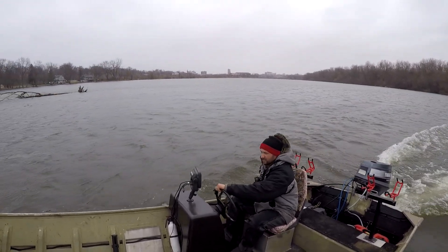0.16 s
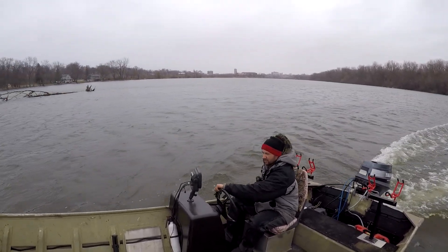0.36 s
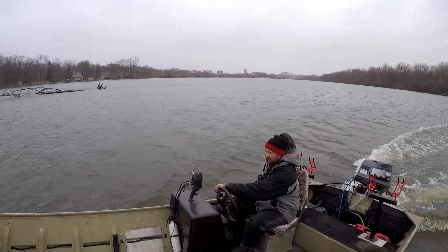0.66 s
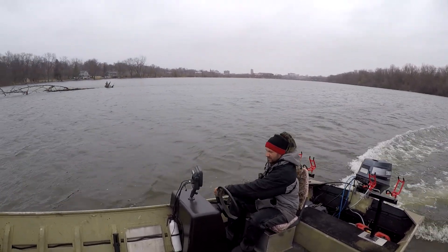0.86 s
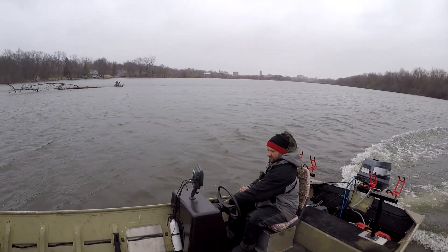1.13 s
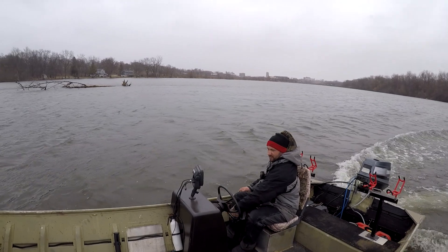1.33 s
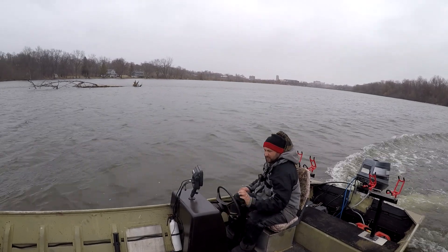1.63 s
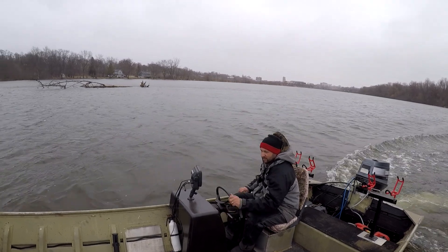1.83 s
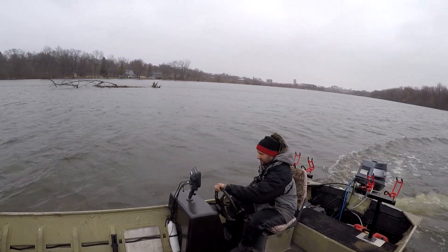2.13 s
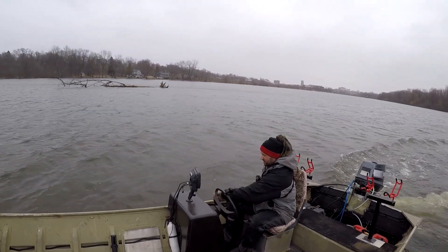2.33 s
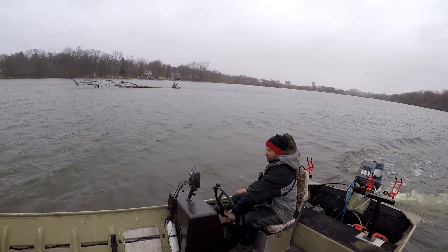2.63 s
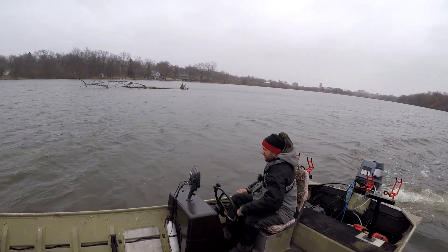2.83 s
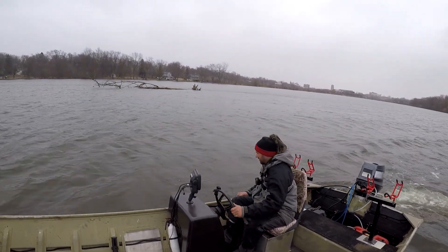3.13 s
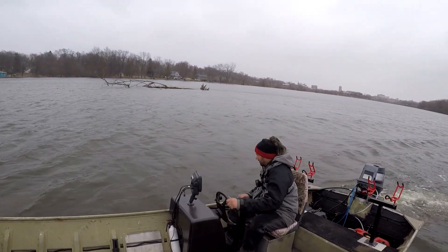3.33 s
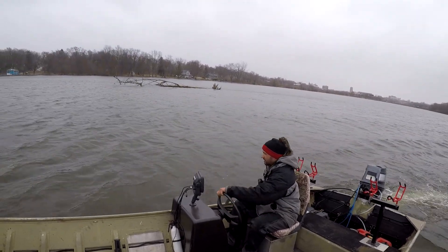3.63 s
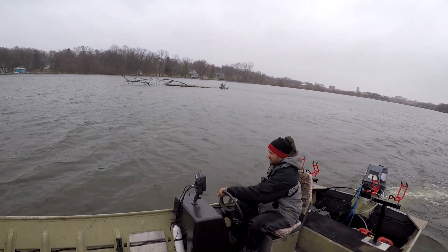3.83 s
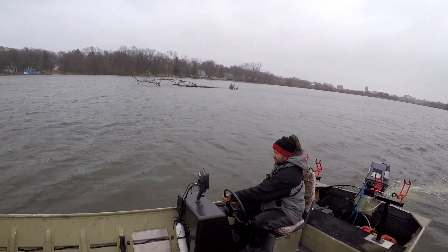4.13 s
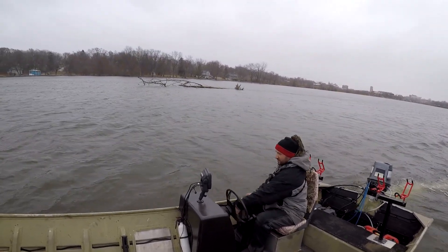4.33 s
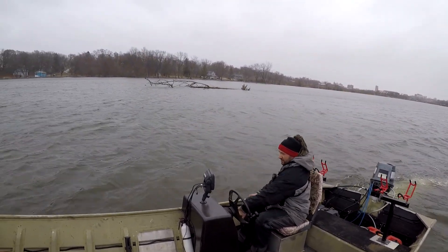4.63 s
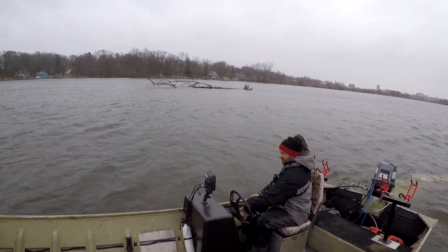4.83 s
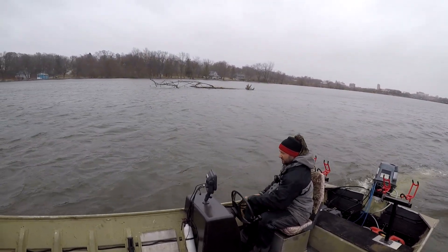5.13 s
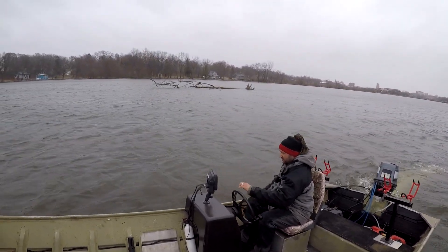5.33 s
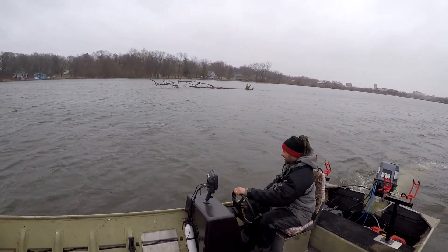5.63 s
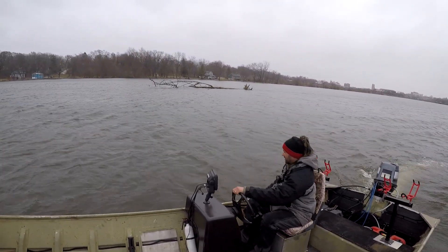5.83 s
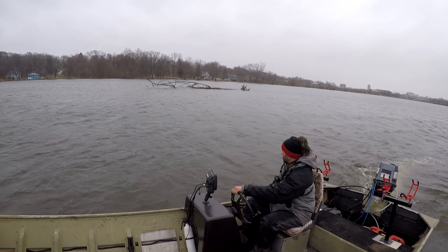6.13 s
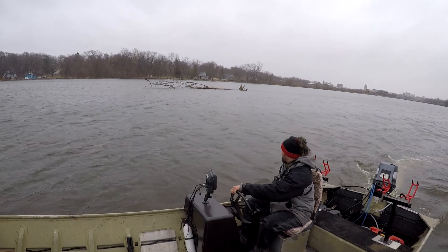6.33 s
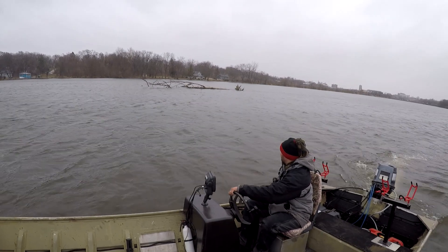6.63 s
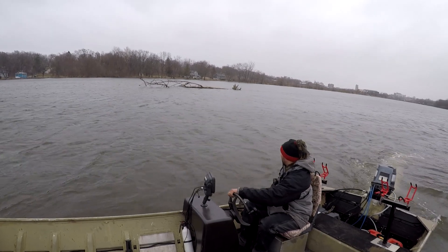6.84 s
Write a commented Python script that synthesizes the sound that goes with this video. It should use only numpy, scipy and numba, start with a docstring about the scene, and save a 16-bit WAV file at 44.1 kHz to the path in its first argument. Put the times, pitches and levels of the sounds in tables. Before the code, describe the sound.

An outboard motor hums low and steady while a flat metal boat drones, wind buffets, water washes and slaps the hull, and loose gear ticks.

```python
"""Outboard jet boat under way

A three-cylinder jet outboard hums at part throttle on a flat metal boat, heard by a small cased camera on a pole.
The motor is a series of shaft-rate tones; the hull drones through noise-driven resonances; wind, wash and spray
are shaped noise. Bubbles gurgle as rising sines, waves slap trapped air, splashes hiss in swelling bands, drops
patter as noise clicks and loose gear ticks by ringing its modes. The camera rides its gain and rounds the peaks."""
import sys
import numpy as np
from scipy import signal
from scipy.fft import rfft, irfft
from scipy.io import wavfile
from scipy.ndimage import uniform_filter1d
from numba import njit

SR = 44100
rng = np.random.default_rng(int(sys.argv[2]) if len(sys.argv) > 2 else 0)


def bounce(signal):
    """Save signal as a 16-bit WAV file at the path given by the first command-line argument."""
    frames = np.transpose(np.atleast_2d(signal))
    limited = np.clip(frames, -1, 1)
    pcm = np.round(limited * 32767).astype(np.int16)
    wavfile.write(sys.argv[1], SR, pcm)


N = 307377
T = np.arange(N) / SR


def undb(db):
    """Decibel law: the amplitude gain of a level in dB."""
    return 10 ** (np.asarray(db) / 20)


def unit(x):
    """Power normalisation: scaled to rms 1."""
    return x / np.sqrt(np.mean(x ** 2))


def crest(x):
    """Peak normalisation: scaled to peak 1."""
    return x / np.max(abs(x))


def read(table):
    """Linear interpolation: every column of a curve table, one value a sample."""
    s, *columns = np.transpose(table)
    return [np.interp(T, s, c) for c in columns]


def band(x, hz, width_hz):
    """Simple resonance: a two-pole filter with gain 1 at its centre."""
    return signal.lfilter(*signal.iirpeak(hz, hz / width_hz, fs=SR), x)


def steep(x, hz, width_hz):
    """Cascaded resonance: the same one applied twice, for dark skirts."""
    return band(band(x, hz, width_hz), hz, width_hz)


def smooth_twice(x, size):
    """Low-pass smoothing: two running means of the same length in samples."""
    return uniform_filter1d(uniform_filter1d(x, size), size)


def walk(rate):
    """Slow random modulation: levels held 1 / rate s and slewed twice; spread 1."""
    hold = int(SR / rate)
    steps = np.repeat(rng.standard_normal(N // hold + 1), hold)
    return unit(smooth_twice(steps, hold)[:N])


def coloured(spectrum, flicker_db, grain_db):
    """Spectral shaping of noise: each third-octave slice flickers alone; shared grains roughen them all."""
    hz, db = np.transpose(spectrum)
    f = np.maximum(np.arange(N // 2 + 1) * SR / N, 1)
    white = rng.standard_normal(N) * undb(grain_db * walk(150))
    full = rfft(white) * undb(np.interp(np.log(f), np.log(hz), db, -120, -120))
    place = 3 * np.log2(f / hz[0])  # in third octaves above the lowest corner
    slices = int(3 * np.log2(hz[-1] / hz[0])) + 2
    out = 0
    for k in range(slices):
        weight = np.clip(1 - abs(place - k), 0, 1)  # neighbouring slices crossfade
        out = out + irfft(full * weight, N) * undb(flicker_db * walk(18))
    return unit(out)


# Shaft speed and firing tone. Each row: time in seconds, shaft turns in Hz, mean firing tone rms in dB.
SHAFT = [(0, 32.87, -17), (.23, 33.24, -21), (.56, 32.56, -17), (.8, 32.52, -21.5), (1.05, 31.94, -21),
         (1.4, 32.13, -18.5), (1.84, 32.37, -18), (2.46, 33.12, -21), (2.75, 32.3, -22), (3.3, 32.43, -25),
         (3.8, 32.5, -18.5), (4.15, 33.02, -22), (4.35, 33.68, -18.5), (4.8, 33.89, -23),
         (5.4, 33.99, -18.5), (5.8, 33.8, -24), (6.2, 34.35, -21.5), (6.75, 33.8, -18.5),
         (6.97, 34.36, -20.5)]
# Overtones that come and go with the load.
# Each row: time in seconds, then the mean rms in dB of the 6th, 8th and 9th orders.
LOAD_OVERTONES = [(0, -46, -37.5, -46.5), (.5, -32.5, -42.5, -51), (1.05, -45, -38, -45),
                  (1.5, -51, -32.5, -37.5), (1.9, -29.5, -31.5, -42), (2.1, -30.5, -33, -42.5),
                  (2.7, -25, -33, -36), (2.95, -36.5, -32.5, -35), (3.3, -31, -36, -39),
                  (3.6, -27, -28, -39), (3.9, -46, -28.5, -31), (4.3, -30.5, -31.5, -34),
                  (4.7, -30.5, -35.5, -32.5), (5.2, -24.5, -38.5, -31), (5.6, -29, -28.5, -28),
                  (6.0, -34, -34.5, -29), (6.4, -37, -35.5, -26.5), (6.97, -35, -30.5, -27.5)]
# Weak tones heard through the hull. Each row: multiple of the shaft rate, level in dB against the drone curve.
HULL_BORNE_ORDERS = [(1, -10.5), (2, -17), (4, -16), (5, -13), (7, -17), (10, -20), (11, -18.5),
                     (12, -26.5)]
# A fainter tone under the firing tone. Each row: time in seconds, mean rms in dB.
FAINT_UNDERTONE = [(0, -30.5), (.7, -34.5), (1.2, -24), (1.7, -33), (2.3, -30.5), (4, -33.5), (6.97, -41)]
UNDERTONE_ORDER = 2.45  # multiple of the shaft rate


def motor(hull_db):
    """Harmonic synthesis: tones on multiples of the shaft rate, mostly whole, waver with uneven firings."""
    hz, firing_db = read(SHAFT)
    turn = 2 * np.pi * np.cumsum(hz * (1 + 0.0025 * walk(12))) / SR
    # each tone: order, level in dB, waver in dB
    tones = list(zip((3, 6, 8, 9), (firing_db, *read(LOAD_OVERTONES)), (.9, 3.0, 3.0, 3.0)))
    tones += [(round(k), hull_db + db, 4.0) for k, db in HULL_BORNE_ORDERS]
    tones.append((UNDERTONE_ORDER, read(FAINT_UNDERTONE)[0], 3.0))
    out = 0
    for order, db, waver_db in tones:
        amplitude = np.sqrt(2) * undb(db + waver_db * walk(17))  # sqrt(2) turns rms into peak
        phase = order * turn + 0.05 * order * walk(20) + rng.uniform(0, 2 * np.pi)
        out = out + amplitude * np.sin(phase)
    return out


# Drone curve of the boat under way. Each row: time in seconds, level in dB before a 1 dB cut.
DRONE = [(0.0, -30), (0.29, -24.5), (0.41, -32), (0.49, -30), (1.18, -26.5), (1.8, -23.5), (2.7, -21),
         (2.79, -24.5), (3.53, -21), (3.84, -23), (3.87, -16.5), (4.02, -22), (4.44, -23.5), (5.32, -21),
         (6.39, -22), (6.46, -19.5), (6.83, -22), (6.97, -17)]
# Panel resonances. Each row: centre in Hz, width in Hz of each of two passes, mean relative level in dB.
PANEL_MODES = [(82.4, 40, -3.5), (132.4, 62, -1), (191.8, 54, 0), (266, 83, -1), (326, 58, -1.5),
               (378.4, 33, -5.5)]


def hull(level_db):
    """Forced vibration: water under the bottom shakes the panel resonances."""
    ring = 0
    for hz, width_hz, db in PANEL_MODES:
        mode = unit(steep(rng.standard_normal(N), hz, width_hz))
        ring = ring + undb(db + 1.22 * walk(14)) * mode
    return undb(level_db - 1.0) * unit(ring)


# Wind gusts. Each row: time in seconds, buffeting level in dB before a 0.1 dB lift.
BUFFETS = [(0.0, -43), (0.09, -14), (0.13, -28), (0.29, -16.5), (0.39, -38), (0.43, -20.5), (0.52, -25),
           (0.79, -19.5), (0.89, -33), (1.03, -19.5), (1.05, -31), (2.45, -22), (2.52, -16), (2.64, -32),
           (3.92, -22.5), (4.02, -15), (4.21, -24.5), (4.44, -21.5), (4.54, -18.5), (4.6, -14), (4.68, -24),
           (4.95, -19.5), (5.01, -32), (5.8, -20.5), (6.81, -33.5), (6.97, -12.5)]
# Wind spectrum. Each row: frequency in Hz, relative density in dB per Hz.
WIND_SPECTRUM = [(4.7, -41), (8.0, -13.5), (64, -13.5), (80, -13.5), (98, -25), (120, -9.5), (200, -120)]
STEADY_WIND_DB = -32.5  # under the buffets


def wind():
    """Turbulent pressure noise: gusts buffet the case over a steady wind, added as powers."""
    level = np.hypot(undb(read(BUFFETS)[0] + 0.1), undb(STEADY_WIND_DB))
    return level * coloured(WIND_SPECTRUM, flicker_db=0.6, grain_db=3.0)


# Water along the side surging with the chop; spray and gurgle follow it too.
# Each row: time in seconds, mean wash level in dB before a 0.24 dB lift.
CHOP = [(0.0, -39), (.6, -40.5), (1.08, -41.5), (1.6, -35), (1.74, -36), (2.71, -35), (2.86, -35),
        (3.02, -36.5), (3.16, -35.5), (3.29, -34.5), (4.14, -36.5), (4.26, -40), (4.51, -36), (4.8, -36),
        (4.95, -34.5), (5.42, -33.5), (6.35, -34.5), (6.81, -34.5), (6.95, -31)]
# Wash spectrum. Each row: frequency in Hz, relative density in dB per Hz.
WASH_SPECTRUM = [(240, -38.5), (400, -23.5), (433, 0), (543, -6), (996, -9.5), (1300, -18.5), (1900, -26.5),
                 (2470, -32.5), (4180, -120)]
USUAL_WASH_DB = -35.5


def wash(wash_db):
    """Flow noise: water washing along the side surges with the chop and wavers at random."""
    return undb(wash_db + 0.24 + 1.1 * walk(9)) * coloured(WASH_SPECTRUM, flicker_db=2.0, grain_db=1.5)


GURGLE_RATE, GURGLE_CYCLES = 70, 4.5  # bubbles a second, cycles until faint
GURGLE_DB = 1.5  # bubble level against its surge, before the scatter of size and pitch
GURGLE_SWING = 1.3  # bubbles swing more than the wash that carries them


def gurgle(wash_db):
    """Bubble resonance: air churned into the wash bursts as short rising tones of scattered pitch and size."""
    surge_db = USUAL_WASH_DB + GURGLE_SWING * (wash_db - USUAL_WASH_DB)
    out = np.zeros(N + SR)
    t = np.arange(SR // 20) / SR
    for when, pitch, size in rng.random((int(GURGLE_RATE * N / SR), 3)):
        hz = 430 * 3.8 ** pitch
        i = int(when * N)
        envelope = np.exp(-3 * t * hz / GURGLE_CYCLES) * np.minimum(t / 0.0005, 1)
        bubble = np.sin(2 * np.pi * hz * t * (1 + 3.5 * t)) * envelope
        db = surge_db[i] + GURGLE_DB - 2.8 * np.log(1 - size) - 11 * pitch
        out[i:i + len(t)] += undb(db) * bubble
    return out[:N]


# Spray spectrum. Each row: frequency in Hz, relative density in dB per Hz.
SPRAY_SPECTRUM = [(880, -19), (1500, -2.5), (2170, -6), (3430, -8), (7530, -19.5), (11200, -32.5),
                  (13300, -39.5), (14500, -67)]
SPRAY_DB, SPRAY_SHARE = -49, 0.32  # level at the usual wash; share of the wash's swings in dB


def spray(wash_db):
    """Broadband droplet noise: a hiss that follows the wash by a share of its swings."""
    spray_db = SPRAY_DB + SPRAY_SHARE * (wash_db - USUAL_WASH_DB)
    return undb(spray_db) * coloured(SPRAY_SPECTRUM, flicker_db=1.07, grain_db=-1.5)


PATTER_RATE, PATTER_DB = 26, -62.5  # drops a second, level in dB before the scatter of size and pitch


def patter():
    """Impact noise: stray drops on the metal give faint short clicks of scattered pitch and size."""
    out = np.zeros(N + SR)
    t = np.arange(SR // 30) / SR
    for when, pitch, size in rng.random((int(PATTER_RATE * N / SR), 3)):
        hz = 2500 * 2.8 ** pitch
        click = unit(steep(rng.standard_normal(len(t)), hz, .5 * hz)) * np.exp(-t / 0.008)
        i = int(when * N)
        out[i:i + len(t)] += undb(PATTER_DB - 4.7 * np.log(1.03 - size) - 7 * pitch) * click
    return out[:N]


# Splashes. Each row: time of the crest in seconds, rms at the crest in dB, rise in seconds, centre in Hz.
SPLASH_EVENTS = [(0.121, -49.5, 0.046, 3000), (.2, -34, 0.1, 573), (1.07, -48.5, 0.04, 3020),
                 (1.389, -43, 0.049, 3900), (1.56, -48.5, 0.083, 2980), (1.75, -46.5, 0.084, 4243),
                 (1.95, -41, 0.015, 2500), (1.97, -31.5, 0.027, 890), (2.72, -41, 0.065, 4160),
                 (2.76, -38.5, 0.04, 1970), (3.06, -45.5, 0.031, 3870), (3.17, -46, 0.027, 3430),
                 (3.42, -38.5, 0.013, 2800), (3.55, -34.5, 0.023, 890), (3.7, -47.5, 0.02, 3450),
                 (3.71, -41, .02, 1400), (3.87, -39, .012, 1200), (3.96, -41.5, .015, 1297),
                 (4.07, -51, 0.013, 3020), (4.08, -43, 0.011, 1300), (4.79, -48.5, 0.031, 2540),
                 (4.83, -40.5, 0.085, 990), (5.24, -48.5, 0.067, 3497), (5.28, -41, 0.085, 1270),
                 (5.52, -47.5, 0.044, 2500), (5.53, -37, 0.038, 599.4), (5.95, -40, .02, 890),
                 (6.34, -36, 0.022, 700), (6.58, -28.5, 0.016, 750), (5.88, -45, 0.03, 2500),
                 (6.33, -46, 0.013, 3500), (6.56, -47.5, 0.022, 3040), (6.92, -43, 0.018, 3463)]
FALL_TO_RISE = 0.87


def splashes():
    """Band-limited noise bursts: sheets of water thrown up along the side, a grainy hiss that swells and dies."""
    out = np.zeros(N)
    drops = rng.standard_normal(N) * undb(0.79 * walk(330))
    for s, db, rise, hz in SPLASH_EVENTS:
        fall = FALL_TO_RISE * rise
        near = slice(max(int((s - 4 * rise) * SR), 0), min(int((s + 4 * fall) * SR), N))
        late = T[near] - s
        swell = np.exp(-.5 * (late / np.where(late < 0, rise, fall)) ** 2)
        hiss = unit(band(steep(drops[near], hz, 0.72 * hz), hz, 3.0 * hz))
        out[near] += undb(db) * swell * hiss
    return out


# Wave slaps. Each row: start in seconds, ring level in dB before its fade, starting pitch in Hz,
# burst level in dB against the ring.
SLAP_EVENTS = [(0.09, -24, 635, -13), (0.443, -26, 770, -21), (.855, -37, 1420, 1), (1.240, -26, 860, -9),
               (1.322, -33, 776, -9), (1.377, -36, 960, 3), (1.777, -23, 978, -1), (1.835, -20, 500, -6.5),
               (2.013, -24.5, 693, -7), (2.291, -32.5, 830, -5), (2.601, -22, 1255, -9),
               (3.141, -21, 457, -12.5), (3.436, -13, 379, -18), (3.435, -36, 1730, -12),
               (3.52, -31, 1030, -14), (3.541, -26, 966, -8), (3.686, -37, 1480, -14),
               (3.689, -24.5, 717, -16), (3.775, -32, 940, -18), (3.863, -14.5, 374, -25),
               (3.934, -23, 844, -18), (4.055, -18.5, 803, -22), (4.224, -15, 483.6, -39),
               (4.65, -29.5, 1251, -12), (4.757, -26, 532.6, -13), (4.803, -21.5, 630, -12),
               (5.111, -21, 476.5, -18), (5.232, -27, 1010, -7), (5.256, -33, 900, -14),
               (5.337, -30, 604, -3), (5.351, -32, 985, -12), (5.378, -26.5, 1060, -6),
               (5.518, -20, 500, -14), (5.73, -21.5, 392, -17), (5.88, -21.5, 1330, -11),
               (5.934, -29, 935, -12), (6.098, -42, 789, -5), (6.339, -21, 474, -17),
               (6.574, -23.5, 968, -9), (6.9, -22.5, 649.3, -21)]
SLAP_T60_S, SLAP_SHORTENS = 0.091, 0.82  # ring time at 700 Hz; power by which higher pockets die sooner


def slaps():
    """Cavity resonance: air trapped under the plate rings briefly, rising a little, with a shorter broad burst."""
    out = np.zeros(N + SR)
    t = np.arange(SR // 5) / SR
    for s, db, hz, burst_db in SLAP_EVENTS:
        fade = np.exp(-np.log(1000) * t / SLAP_T60_S * (hz / 700) ** SLAP_SHORTENS)
        wobble = 0.074 * np.cumsum(smooth_twice(rng.standard_normal(len(t)), 24))
        pocket = np.sin(2 * np.pi * hz * t * (1 + .8 * t) + wobble) * np.minimum(t / 0.0011, 1)
        noise = unit(steep(rng.standard_normal(len(t)), 950., 1300.0))
        burst = noise * np.minimum(t / 0.0017, 1) * np.sqrt(fade)
        i = int(s * SR)
        out[i:i + len(t)] += undb(db) * fade * (pocket + undb(burst_db) * burst)
    return out[:N]


DETUNE = 0.012  # spread of the modes from tick to tick, as a fraction of their pitch


def struck(push, modes, bright_hz, focus_db):
    """Modal synthesis: a push rings detuned modes, weighted by distance from one pitch; the peak is 1."""
    out = 0
    for k, (hz, db, t60) in enumerate(modes):
        mode_hz = hz * (1 + DETUNE * rng.standard_normal())
        width_hz = np.log(1000) / (np.pi * t60)  # a longer ring is a narrower resonance
        ring = crest(band(band(push, hz, hz / 2.0), mode_hz, width_hz))
        gain = undb(db - focus_db * abs(np.log2(hz / bright_hz)))
        out = out + (-1) ** k * gain * ring
    return crest(out)


# Ticks of loose gear. Each row: start in seconds, peak of the lower modes in dB, favoured pitch in Hz,
# upper modes in dB against that peak, narrowness in dB per octave, contact decay in seconds.
TICK_EVENTS = [(0.205, -36, 3180, -22, 30, .004), (1.259, -33, 4830, -34, 4, 0.005),
               (1.683, -28.5, 4190, -1, 4, 0.004), (1.688, -6.5, 2900, -20, 12, 0.003),
               (1.777, -23, 2600, -15, 2, 0.004), (1.791, -28.5, 3100, -24, 10, .005),
               (1.835, -28, 2000, -17, -3, 0.0074), (1.946, -36, 2970, -12, 10, .008),
               (2.039, -33, 4170, -16, 4, 0.0091), (2.152, -35, 3500, -23, 15, 0.0031),
               (2.22, -44, 5300, -6, 20, .004), (2.352, -32, 2980, -17, 6, 0.0052),
               (2.478, -39, 4270, -11, 25, .003), (2.504, -24.5, 3440, -23, 50, 0.0044),
               (2.541, -17, 3200, -15, 2, 0.0075), (2.585, -34, 2420, -28, 15, 0.0082),
               (3.025, -30.5, 5210, -9, 1, 0.0066), (3.062, -29, 2387, -16, 10, .003),
               (3.11, -34, 4590, -14, 4, 0.0021), (3.132, -25.5, 2720, -32, 22, 0.0094),
               (3.19, -31.5, 2500, -19, 11, 0.0043), (3.402, -28.5, 2500, -30, 14, 0.0034),
               (3.524, -35, 4780, -10, 9, 0.0052), (3.683, -35, 2930, -14, 14, .004),
               (4.055, -41, 3500, -3, 5, .002), (4.07, -40, 5300, -10, 14, 0.0038),
               (4.167, -44, 4200, -6, 7, .003), (4.222, -39.5, 5000, -5, 6, 0.0019),
               (4.295, -47, 5000, -1, 5, 0.0022), (4.433, -33.5, 4577, -18, 4, .004),
               (4.522, -38, 3850, -15, 12, 0.0041), (4.543, -42, 3400, -8, -1, 0.0027),
               (4.622, -53, 5300, 13, 20, .005), (4.752, -36.5, 4375, -12, 13, 0.0044),
               (4.968, -36.5, 3500, -18, 12, .004), (5.077, -33.5, 5000, -10, 19, 0.0051),
               (5.109, -33.5, 3916, -5.5, 21, 0.0036), (5.211, -31, 4500, -15, 2, 0.0042),
               (5.231, -27.5, 4470, -17, 13, .005), (5.35, -32, 5200, -21, 10, .003),
               (5.377, -26.5, 4690, -16, 11, 0.0056), (5.435, -33.5, 3520, -14, 3, 0.0045),
               (5.489, -37, 4008, -12, 10, .004), (5.863, -32, 2276, -21, 3, 0.0038),
               (6.191, -37.5, 4075, -17, 17, 0.0045), (6.57, -31, 2836, -22, 5, 0.0038),
               (6.906, -30, 3380, -15, 9, .004)]
# Lower modes of the gear. Each row: nominal pitch in Hz, relative peak in dB, t60 in seconds.
LOWER_MODES = [(1490, -12.5, .008), (1973, -7, 0.013), (2323, -3, 0.027), (2854, -0.5, 0.015),
               (3440, -8, 0.014), (4114, -5, 0.022), (4630, -8, 0.022), (5380, -7, 0.0068)]
# Upper modes of the gear. Each row: nominal pitch in Hz, relative peak in dB, t60 in seconds.
UPPER_MODES = [(6010, -8.5, 0.012), (6830, -4.5, 0.015), (7520, -5.5, 0.013), (8180, -6.5, 0.012),
               (10200, -15, 0.0052), (11600, -19, .006)]
FIRST_TOUCH, CHATTER_RISE_S = 3.5, 0.0011  # size of the first touch against the chatter


def ticks():
    """Impact excitation: a sharp touch and short chatter ring the gear; each tick sets its upper modes' level."""
    out = np.zeros(N + SR)
    t = np.arange(SR // 16) / SR
    for s, db, bright_hz, upper_db, focus_db, contact in TICK_EVENTS:
        envelope = np.exp(-t / max(contact, .001)) * np.minimum(t / CHATTER_RISE_S, 1)
        push = rng.standard_normal(len(t)) * envelope
        push[0] = FIRST_TOUCH
        lower = struck(push, LOWER_MODES, bright_hz, focus_db)
        upper = struck(push, UPPER_MODES, 7000., 0)
        i = int(s * SR)
        out[i:i + len(t)] += undb(db) * (lower + undb(upper_db) * upper)
    return out[:N]


def scene():
    """Superposition: motor, hull, wind, water and gear summed at the microphone."""
    hull_db, wash_db = read(DRONE)[0], read(CHOP)[0]
    boat = motor(hull_db) + hull(hull_db)
    water = wash(wash_db) + gurgle(wash_db) + spray(wash_db)
    impacts = patter() + splashes() + slaps() + ticks()
    return (boat + wind() + water + impacts)[None]


@njit
def hold_level(x, top, ratio, attack, release):
    """Compression: a follower rises fast and sinks slowly with the sound; gain drops while it is above top."""
    y, e, smooth = np.empty(len(x)), top, top
    for i in range(len(x)):
        e += (abs(x[i]) - e) * (attack if abs(x[i]) > e else release)
        smooth += (max(e, top) - smooth) * attack
        y[i] = x[i] * (top / smooth) ** (1 - 1 / ratio)
    return y


CEILING = .55  # amplitude the rounded peaks approach
CASE_HZ, TOP_HZ = 10400, 14500  # gentle muffling by the case; steep cut of the treble


def record(dry):
    """Compression, saturation and low-pass filtering: the camera rides its gain; its case muffles the top."""
    # attack and release are the fractions of the gap closed each sample
    held = hold_level(dry[0], 0.25, 4.0, 0.0065, 0.00069)
    rounded = CEILING * np.tanh(held / CEILING)
    muffled = signal.sosfilt(signal.butter(2, CASE_HZ, fs=SR, output="sos"), rounded)
    return signal.sosfilt(signal.ellip(8, .2, 70, TOP_HZ, fs=SR, output="sos"), muffled)[None]


dry = scene()
out = record(dry)
bounce(out)
```